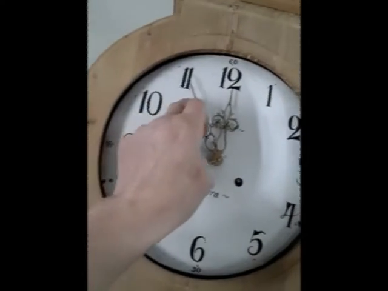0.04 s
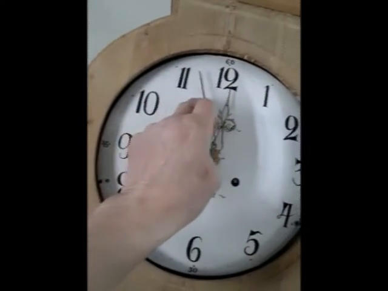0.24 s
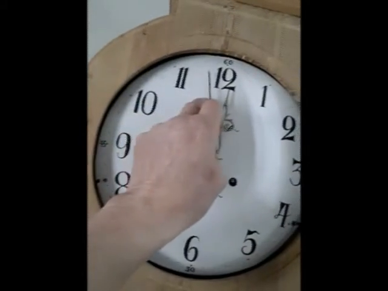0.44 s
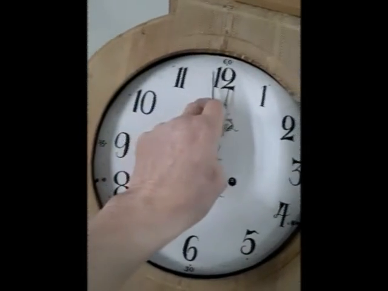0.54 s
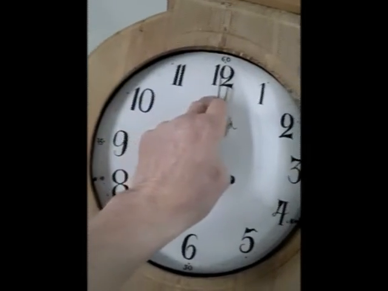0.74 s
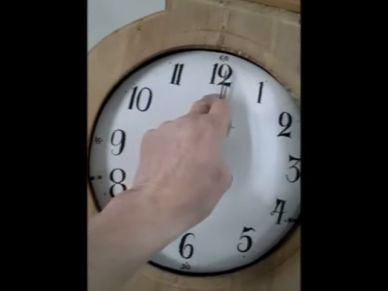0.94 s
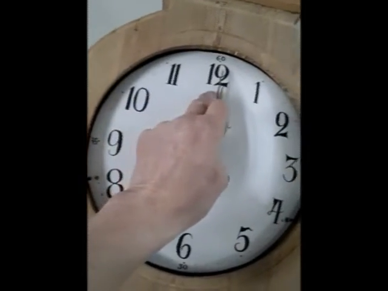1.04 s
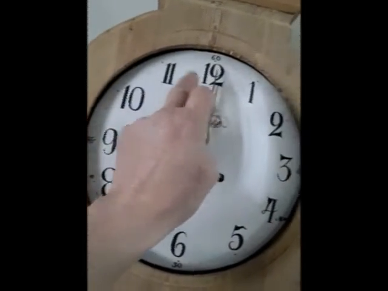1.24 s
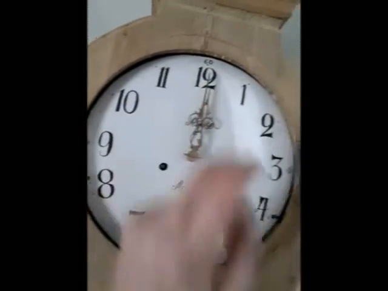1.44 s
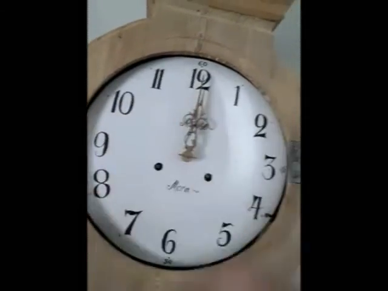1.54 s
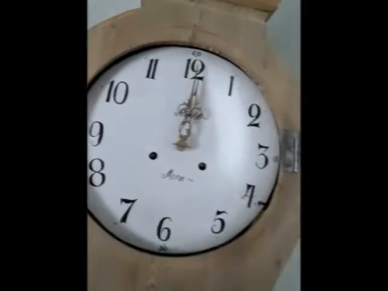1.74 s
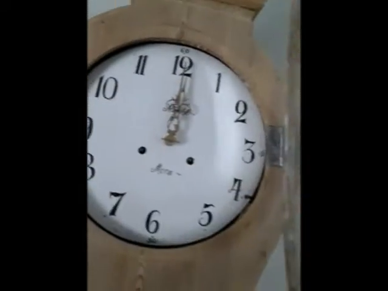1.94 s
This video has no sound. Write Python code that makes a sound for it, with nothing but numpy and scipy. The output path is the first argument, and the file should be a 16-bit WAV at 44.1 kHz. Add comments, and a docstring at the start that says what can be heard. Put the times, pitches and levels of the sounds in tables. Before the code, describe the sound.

An old wooden clock's mechanism clicks and clunks close by in a quiet room as it is set. A faint whirr stops with a click at 0.2 seconds. A thin steel ping follows at 0.4, then the loudest clunk around 0.6. Near 0.9 come a click and a tiny squeak, and the gears run on with soft, fast ticking until about 2 seconds, with another clunk at 1.6.

```python
"""Setting a wooden clock

In a quiet room a finger pushes the minute hand of an old wooden-cased clock up to the hour.
Levers lift and drop, and each impact excites the modes of case and movement: clunks, and the
ping of a thin steel part. A sliding steel edge squeals. The wheel train whirrs briefly,
is caught, then is let go and runs on with fine, fast ticks over the rumble of its arbors."""
import sys
import numpy as np
from scipy import signal
from scipy.io import wavfile
from scipy.ndimage import uniform_filter1d

SR = 44100
rng = np.random.default_rng(int(sys.argv[2]) if len(sys.argv) > 2 else 0)


def wav_out(sig):
    """Save sig, one row per channel (or a flat mono array), as 16-bit PCM at SR to the path in sys.argv[1]."""
    wavfile.write(sys.argv[1], SR, np.round(np.clip(np.atleast_2d(sig).T, -1, 1) * 32767).astype(np.int16))


N = 88200
T = np.arange(N) / SR
ATTACK_S = 0.0011

# Reverberation of case and room. Each row: frequency in Hz, T60 in seconds.
REVERBERATION = [(100, 0.91), (260, 0.56), (700, 0.77), (1840, 0.56), (4850, 0.38), (11000, 0.31)]
# The stereo field. Each row: frequency in Hz, correlation of the sides, left over right in dB.
STEREO_FIELD = [(60, 0.24, -2), (148, .99, 0), (294, 0.92, -1), (607, 0.6, 0), (1210, 0.32, -2.5),
                (1960, 0.073, -4.5), (3370, 0.041, 0), (6500, -0.15, -10), (8950, -0.65, -6),
                (12000, 0.34, -2)]
# Two runs of the wheel train. Each row of a run: time in seconds, teeth per second,
# then relative levels in dB of the ticks, the wheels' ring and the arbors' rumble.
TRAIN_RUNS = [
    [(0.02, 34, -60.5, -63, -68), (0.09, 46, -52, -55, -79), (0.15, 70, -48.5, -46.5, -66),
     (0.225, 82, -48.5, -64, -49.5)],
    [(0.93, 40, -59, -43.5, -50), (1.08, 80, -50.5, -58, -50), (1.19, 88, -55, -52, -53.5),
     (1.3, 90, -50, -53, -50.5), (1.43, 95, -55, -54.5, -57), (1.57, 110, -52.5, -52.5, -57),
     (1.8, 100, -51, -51.5, -55.5), (1.92, 110, -51.5, -56, -53), (2.0, 100, -56, -55, -58)],
]


def from_db(db):
    """Amplitude grows tenfold with every 20 dB."""
    return 10 ** (np.asarray(db) / 20)


def rms_one(x):
    """Normalisation to unit mean power."""
    return x / np.sqrt(np.mean(x ** 2) + 1e-20)


def at_hz(points, hz):
    """Interpolation of a table's columns on a log-frequency axis."""
    frequencies, *columns = np.transpose(points)
    return np.squeeze([np.interp(np.log(hz), np.log(frequencies), c) for c in columns])


def decay(t, t60):
    """Damping: unity until t = 0, then a fall of 60 dB every t60 seconds."""
    return np.exp(-np.log(1000) * np.maximum(t, 0) / max(t60, 1e-3))


def rise(t, seconds):
    """Exponential build-up from t = 0."""
    return 1 - np.exp(-np.maximum(t, 0) / max(seconds, 1e-4))


def strokes(rows):
    """Envelope of sliding contact: each stroke swells and fades as the root of a half sine."""
    return sum(from_db(db) * np.sqrt(np.abs(np.sin(np.pi * np.clip((T - start) / length, 0, 1))))
               for start, length, db in rows)


def pan(db):
    """A level difference, split evenly between left and right."""
    return from_db(np.array([[db], [-db]]) / 2)


def noise_bands(spectrum):
    """Partly coherent stereo noise, as (Hz, band) pairs whose powers add up to one."""
    edges = np.geomspace(30, 13000, 23)
    white = rng.standard_normal((2, 2, N))
    bands = []
    for k, (low, high) in enumerate(zip(edges, edges[1:])):
        bandpass = signal.butter(3, [low, high], "band", fs=SR, output="sos")
        mid, side = signal.sosfilt(bandpass, white[k % 2])
        hz = np.sqrt(low * high)
        correlation, balance_db = at_hz(STEREO_FIELD, hz)
        band = np.sqrt(1 + correlation) * mid + np.sqrt(1 - correlation) * np.array([side, -side])
        bands.append((hz, from_db(at_hz(spectrum, hz)) * pan(balance_db) * band))
    total_rms = np.sqrt(sum(np.mean(band ** 2) for _, band in bands))
    return [(hz, band / total_rms) for hz, band in bands]


def coloured_noise(spectrum):
    """Adjacent bands add up to a continuous spectrum."""
    return sum(band for _, band in noise_bands(spectrum))


def ringing(modes, swell_s):
    """An impulse response is a sum of damped modes; a phase offset sets the sides' correlation."""
    response = 0
    for hz, db, t60 in modes:
        correlation, balance_db = at_hz(STEREO_FIELD, hz)
        offset = np.arccos(correlation) / 2
        tone = np.sin(2 * np.pi * hz * T + np.array([[offset], [-offset]]))
        response = response + from_db(db) * pan(balance_db) * decay(T, t60) * tone
    return response * rise(T, swell_s)


def struck(times, db, response):
    """Superposition: each blow adds a delayed, scaled copy of the impulse response."""
    impulses = np.zeros(N)
    impulses[np.clip((np.asarray(times) * SR).astype(int), 0, N - 1)] = from_db(db)
    return signal.fftconvolve(impulses[None], response, axes=1)[:, :N]


def room():
    """Stationary broadband noise is heard as a faint hush."""
    # Each row: frequency in Hz, relative spectral density in dB.
    hush_spectrum = [(30, -1), (70, 3), (140, -2), (300, -23), (1000, -1), (3000, -3), (11000, -16)]
    return from_db(-66.5) * coloured_noise(hush_spectrum)


def finger():
    """Sliding friction between finger and dial makes a dull noise."""
    # Strokes on the dial. Each row: start in seconds, length in seconds, level in dB.
    dial_rubs = [(0.404, 0.16, -50), (0.97, 0.064, -52), (1.215, 0.1, -53)]
    # Friction noise. Each row: frequency in Hz, relative spectral density in dB.
    rub_spectrum = [(60, -37), (150, -33), (230, -7), (350, 5.5), (520, -1), (900, -36), (3000, -6.5),
                    (11000, -28)]
    return strokes(dial_rubs) * coloured_noise(rub_spectrum)


def arbors():
    """Forced vibration: turning arbors rumble and drive a case resonance, fading once they stop."""
    # The rumble. Each row: frequency in Hz, relative spectral density in dB.
    rumble_spectrum = [(60, -34), (110, -20), (145, 3), (190, -19), (330, 3.5), (440, -10), (560, 0.5),
                       (900, -48), (3000, -46)]
    hum_hz, bandwidth_hz, hum_db, rumble_db = 232, 4, -3.5, -7.5
    level = 0
    for run in TRAIN_RUNS:
        times, *_, run_db = np.transpose(run)
        gate = (T > times[0]) * decay(T - times[-1], at_hz(REVERBERATION, hum_hz))
        level = level + from_db(np.interp(T, times, run_db)) * gate
    resonance = signal.iirpeak(hum_hz, hum_hz / bandwidth_hz, fs=SR)
    hum = rms_one(signal.lfilter(*resonance, rng.standard_normal(N)))
    return level * (from_db(hum_db) * hum + from_db(rumble_db) * coloured_noise(rumble_spectrum))


def wheel_train():
    """Uneven tooth impacts ring the wheels; reverberation in the case blurs the ticks to a whirr."""
    # One tick. Each row: frequency in Hz, relative spectral density in dB.
    tooth_spectrum = [(100, -28), (230, -2), (400, -11.5), (650, 0.5), (1000, 3.5), (1400, -6.5),
                      (1900, 2.5), (2800, -12), (4500, 2), (5700, -11.5), (7000, -8.5), (9000, -15),
                      (11500, -14)]
    # Modes of wheels and plates. Each row: frequency in Hz, relative level in dB, T60 in seconds.
    wheel_modes = [(1020.5, -1, 0.083), (1816, 0.5, 0.12), (1875, 4, 0.13), (1950, -10, 0.052)]
    tick_spread_db, ring_spread_db, colour_spread_db = 2, 3.5, 2
    jitter = 0.2  # as a share of the run's shortest tooth period
    tick_t60_s, tail_db = 0.034, 6
    teeth = []
    for run in TRAIN_RUNS:
        times, rate, tick_db, ring_db, _ = np.transpose(run)
        teeth_passed = np.cumsum(np.interp(T, times, rate, left=0, right=0)) / SR
        due = T[np.flatnonzero(np.diff(np.ceil(teeth_passed)) > 0)]
        late, tick_draw, ring_draw, *colours = rng.standard_normal((200, 25))[:len(due)].T
        teeth.append([due + jitter * late / rate.max(),
                      np.interp(due, times, tick_db) + tick_spread_db * tick_draw,
                      np.interp(due, times, ring_db) + ring_spread_db * ring_draw, *colours])
    impacts, tick_db, ring_db, *colours = np.hstack(teeth)
    whirr = struck(impacts, ring_db, rms_one(ringing(wheel_modes, ATTACK_S)))
    for (hz, band), colour in zip(noise_bands(tooth_spectrum), colours):
        tail = from_db(tail_db) * decay(T, at_hz(REVERBERATION, hz) / 2)
        tick = rms_one(decay(T, tick_t60_s) + tail)
        # Incoherent ticks add in power, hence the doubled decibels.
        power = struck(impacts, 2 * (tick_db + colour_spread_db * colour), tick[None] ** 2)
        whirr = whirr + band * np.sqrt(np.abs(power))
    return whirr / np.sqrt(rate.max() * N / SR)  # normalised by the last run's top rate


def steel_edge():
    """Friction-excited vibration: sliding steel squeals briefly on a few unsteady high tones."""
    # Slides of the edge. Each row: start in seconds, length in seconds, level in dB.
    edge_slides = [(0.923, 0.0202, -49), (0.954, .026, -43.5)]
    # Partials of the squeal. Each row: frequency in Hz, relative level in dB.
    squeal_partials = [(7271, 0), (8150, -13), (11130, -12)]
    wobble_hz = 30
    squeal = 0
    for hz, db in squeal_partials:
        wobble = wobble_hz * rms_one(uniform_filter1d(rng.standard_normal(N), size=100))
        tone = np.sin(2 * np.pi * np.cumsum(hz + wobble) / SR)
        squeal = squeal + from_db(db) * pan(at_hz(STEREO_FIELD, hz)[1]) * tone
    return strokes(edge_slides) * squeal


def levers():
    """Impact excitation: each contact snaps, clatters, reverberates and sets five parts ringing."""
    # Lever contacts. Each row: start in seconds; level, bass shelf and treble shelf in dB; hold of the
    # clatter in seconds; snap over clatter in dB; drive of case, lever, steel and frame in dB.
    lever_contacts = [(0.222, -42, -8, 0, .008, -19, -42.5, -80, -83, -61),
                      (0.2281, -31.5, -0.5, -0.5, 0.0022, 6.5, -56, -55.5, -58, -45.5),
                      (0.4026, -39.5, -30, 0, 0.0063, 4.5, -52, -66, -38.5, -56),
                      (0.420, -46, -0.5, 1, 0.022, -10, -66, -75, -65, -58.5),
                      (0.5585, -23, -7.5, -1.5, 0.003, 4.5, -38, -29, -48, -39.5),
                      (0.575, -30.5, 4, 1, 0.0096, -8, -38.5, -28, -65, -57),
                      (0.600, -34, 9, 2.5, 0.015, -2, -32, -36.5, -71, -49),
                      (0.896, -52.5, -14, 3.5, 0.033, -1, -73, -55, -75, -77),
                      (0.9206, -30, -6.5, 7, 0.0028, -14, -44, -41, -58.5, -55.5),
                      (0.932, -41.5, -4, 6.5, 0.017, -11, -51, -78, -55, -64),
                      (0.955, -46, 10, 10, 0.028, -5, -57.5, -82, -52, -68),
                      (1.21, -50.5, -12, 8.5, 0.024, -7, -69, -74, -45, -70),
                      (1.517, -56, -8, 2, .003, -3, -72, -75, -66, -77),
                      (1.620, -30, 1.5, -3, 0.015, 5.5, -40.5, -50, -65, -31.5),
                      (1.627, -41, -10, 11.5, .006, 4.5, -57, -49, -65, -41.5),
                      (1.635, -35.5, 12, 6, 0.0074, -5, -42, -51, -53, -45)]
    # Contact noise. Each row: frequency in Hz, relative spectral density in dB.
    contact_spectrum = [(40, -20), (85, -32), (115, -20), (150, 4), (200, 3.5), (340, 5.5), (450, -6.5),
                        (600, 4.5), (740, -2.5), (1000, 1), (2000, 2), (3200, -3), (6500, -9), (8800, -22),
                        (11500, -15.5)]
    # Colour against the clatter. Each row: frequency in Hz, snap gain in dB, tail gain in dB.
    contact_tints = [(200, -26, -3), (500, -9, 1.5), (1010, -8, 1), (2180, 3.5, -1), (3500, -5, 1.5),
                     (6360, -5, -2.5), (8800, 1, -6), (11500, 0, 2)]
    # Modes of the wooden case, lever, thin steel part, movement frame and catch.
    # Each row: frequency in Hz, relative level in dB, T60 in seconds.
    case_modes = [(145.4, -5.5, 0.74), (165.7, -19, 0.27), (233.1, -5, 0.54), (332.7, -11, 0.93),
                  (633, -12.5, 0.54)]
    lever_modes = [(261.8, 5, 0.44), (472.5, -7, 0.25), (1050.7, -9.5, 0.56), (1403.7, -5, 0.18),
                   (1696, -14, 0.47)]
    steel_modes = [(3188, 0, 0.37), (3260, 0, 0.33), (3400, -4, 0.16), (3670, -5, 0.28), (3989, -6.5, 0.39),
                   (4510, -2.5, 0.17), (4780, -4, 0.14), (6380, -2, 0.14), (6620, -4.5, 0.15),
                   (6680, -11, 0.45), (6630, -9, 0.18)]
    frame_modes = [(319.3, -4, 0.39), (361.3, -1.5, 0.4), (624, 1, 0.088), (895, 0, 0.13), (955, 0, 0.083),
                   (1328, -19, 0.22), (1711, 2, 0.096), (1962, 1, 0.13), (2087, -10, 0.14),
                   (2379, -11, 0.21)]
    catch_modes = [(1797, -6.5, 0.039), (2076, -4, 0.036), (2302, -7, 0.034), (3380, -14, 0.086)]
    snap_t60_s, clatter_t60_s, tail_db = 0.0055, 0.075, -8.5
    bass_hz, mid_hz, upper_hz, treble_hz = 344, 1080, 2050, 5560
    starts, db, bass_db, treble_db, hold_s, snap_db, *drives = np.transpose(lever_contacts)
    case_db, lever_db, steel_db, frame_db = drives
    age = T - starts[:, None]
    # Power envelopes, one row for each contact.
    onset = rise(age, ATTACK_S) ** 2
    clatter = onset * decay(age - hold_s[:, None], clatter_t60_s) ** 2
    snap = onset * (from_db(snap_db)[:, None] * decay(age - 2 * ATTACK_S, snap_t60_s)) ** 2
    contact_noise = 0
    for hz, band in noise_bands(contact_spectrum):
        bass = at_hz([(bass_hz, 1), (mid_hz, 0)], hz)
        treble = at_hz([(upper_hz, 0), (treble_hz, 1)], hz)
        power = from_db(db + bass * bass_db + treble * treble_db) ** 2
        tail = onset * (from_db(tail_db) * decay(age, at_hz(REVERBERATION, hz))) ** 2
        snap_share, tail_share = from_db(at_hz(contact_tints, hz)) ** 2
        envelopes = snap_share * snap + clatter + tail_share * tail
        contact_noise = contact_noise + band * np.sqrt(power @ envelopes)
    return (contact_noise
            + struck(starts, case_db, ringing(case_modes, swell_s=0.0054))
            + struck(starts, lever_db, ringing(lever_modes, swell_s=0.0062))
            + struck(starts, steel_db, ringing(steel_modes, swell_s=0.016))
            + struck(starts, frame_db, ringing(frame_modes, swell_s=0.001))
            + struck(starts, db + snap_db, ringing(catch_modes, swell_s=ATTACK_S)))


def scene():
    """The sound pressures of movement, finger and room add linearly."""
    return levers() + wheel_train() + arbors() + steel_edge() + finger() + room()


def record(dry):
    """Band limiting: an elliptic low-pass cuts the highest treble steeply."""
    cutoff_hz = 11850
    return signal.sosfilt(signal.ellip(12, .2, 80, cutoff_hz, fs=SR, output="sos"), dry)


dry = scene()
out = record(dry)
wav_out(out)
```